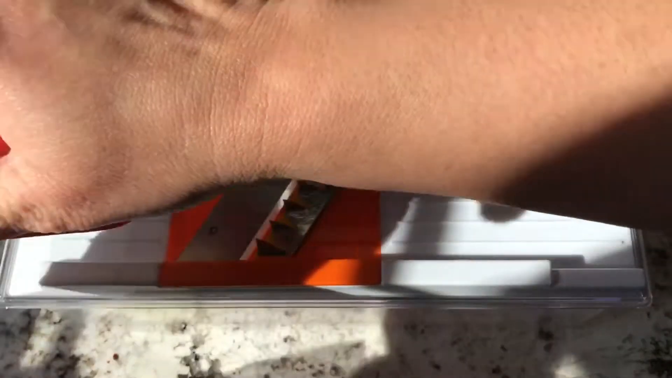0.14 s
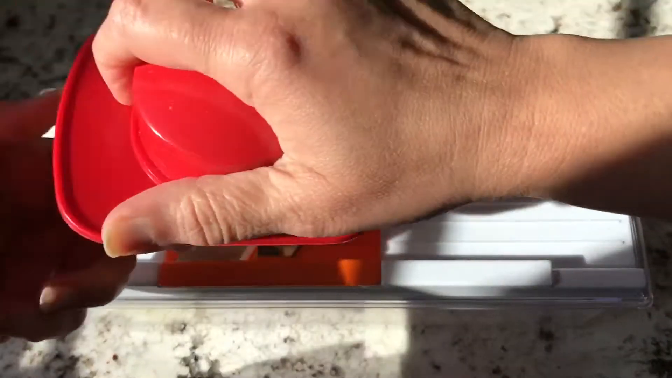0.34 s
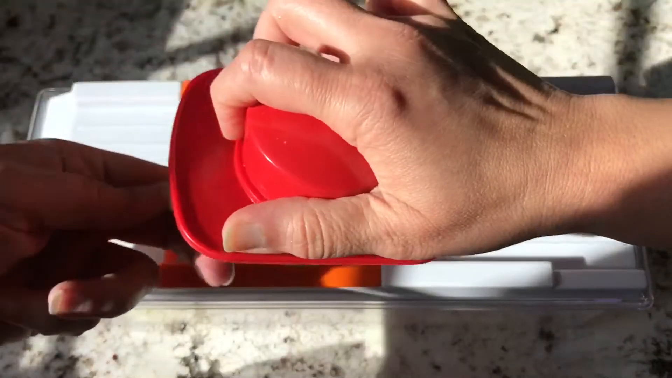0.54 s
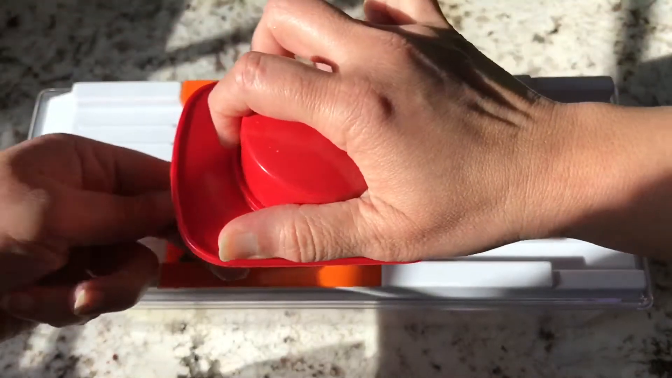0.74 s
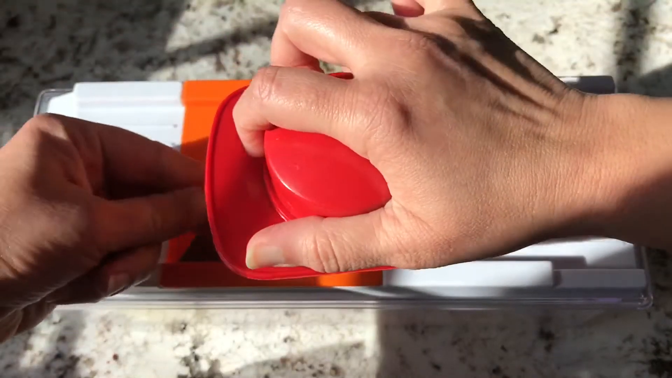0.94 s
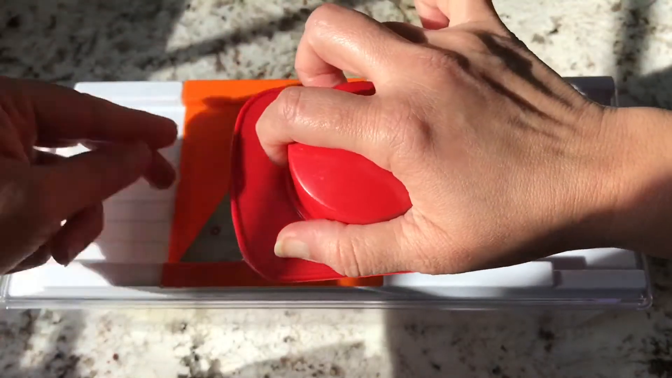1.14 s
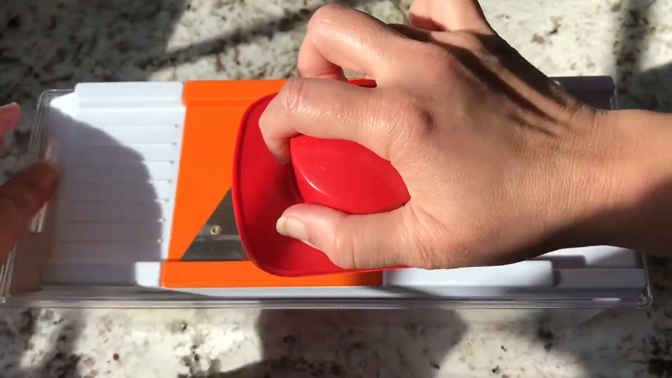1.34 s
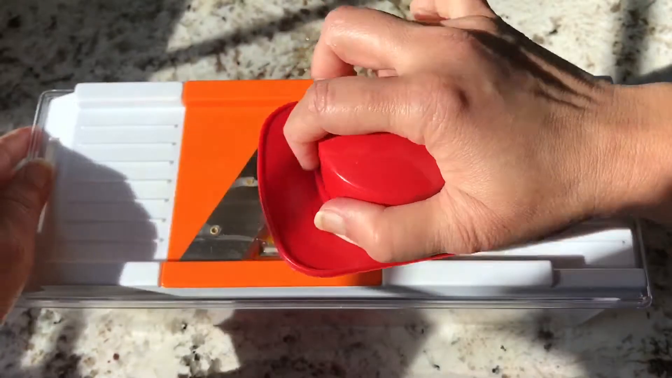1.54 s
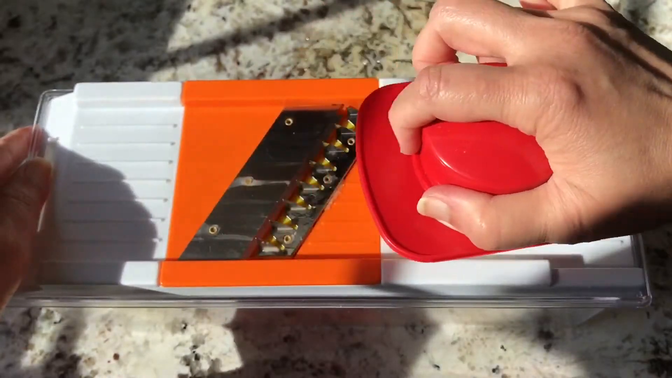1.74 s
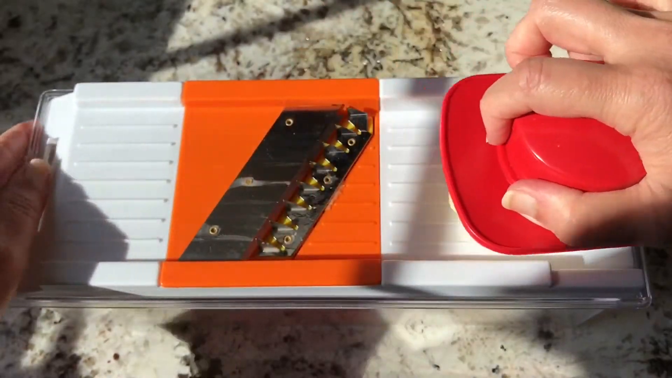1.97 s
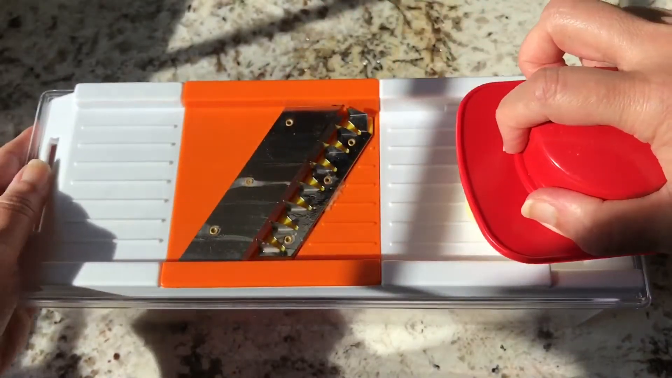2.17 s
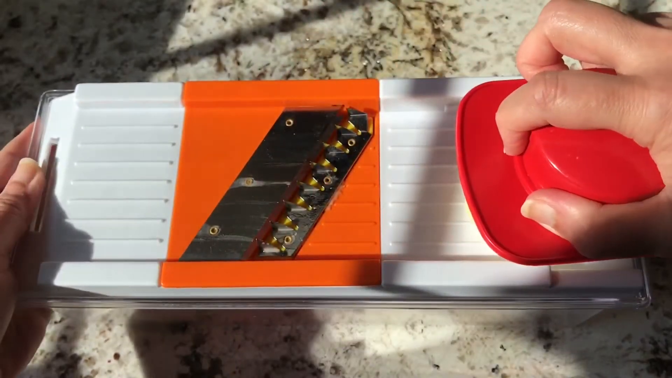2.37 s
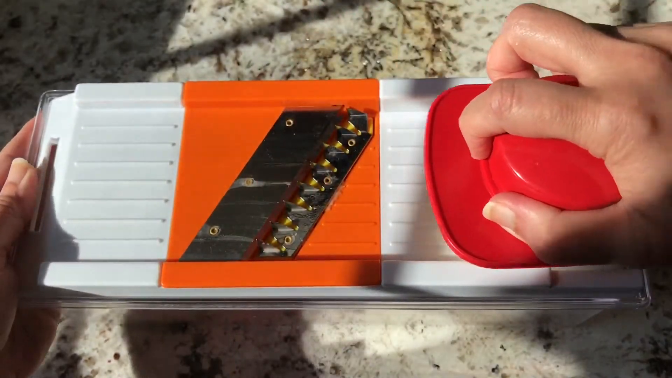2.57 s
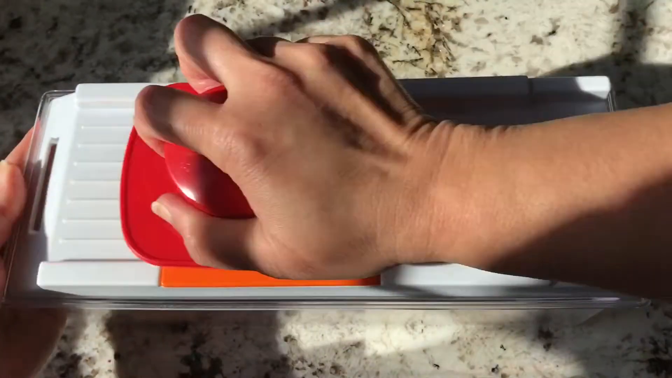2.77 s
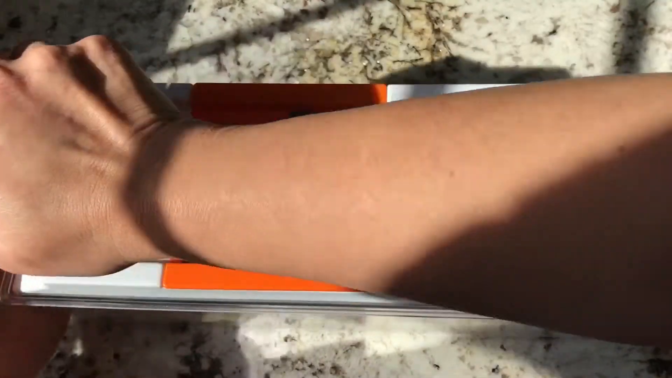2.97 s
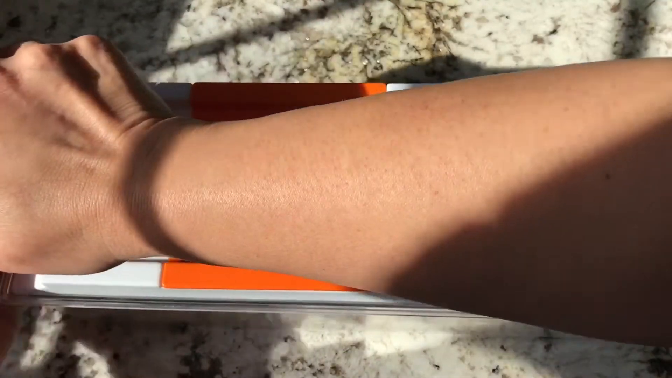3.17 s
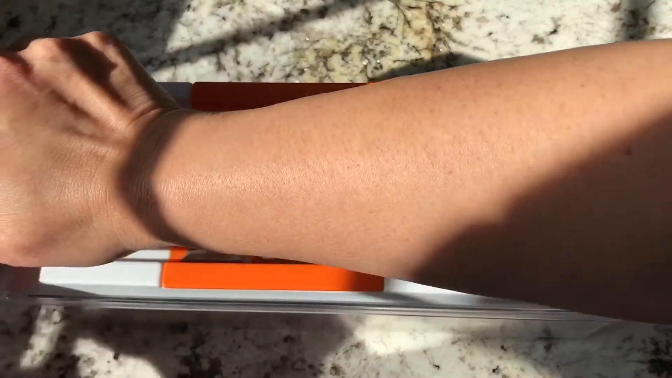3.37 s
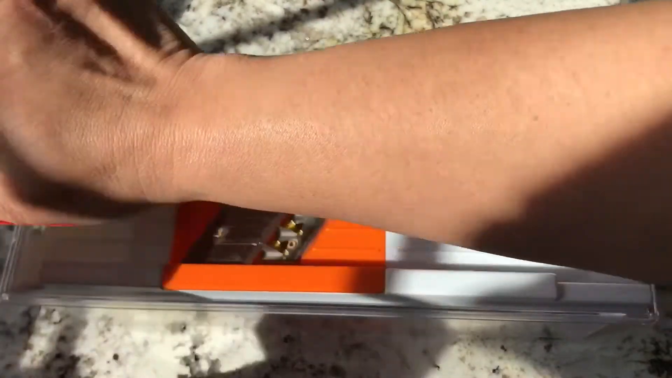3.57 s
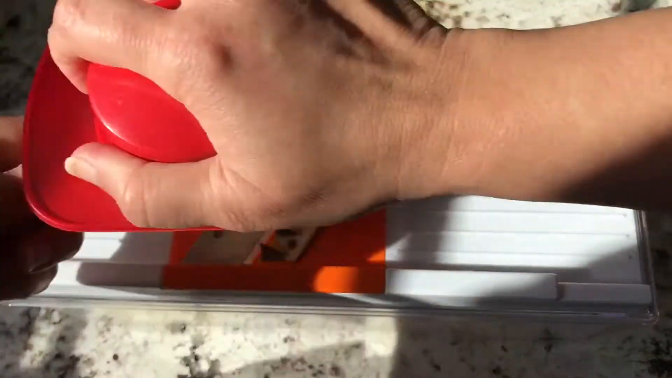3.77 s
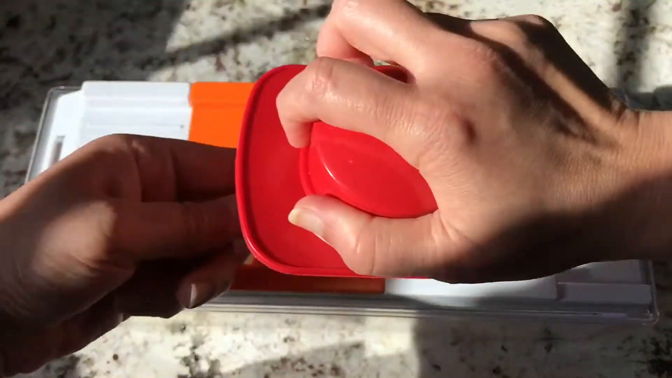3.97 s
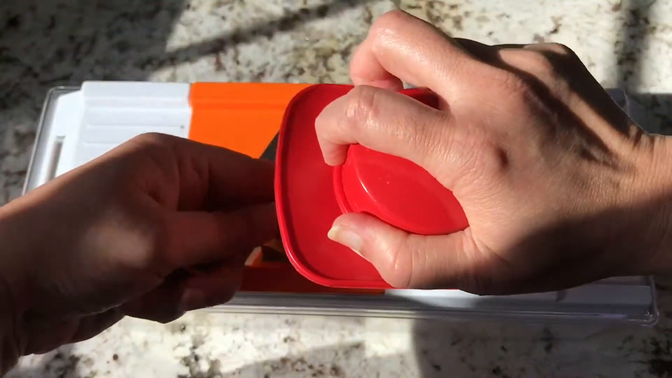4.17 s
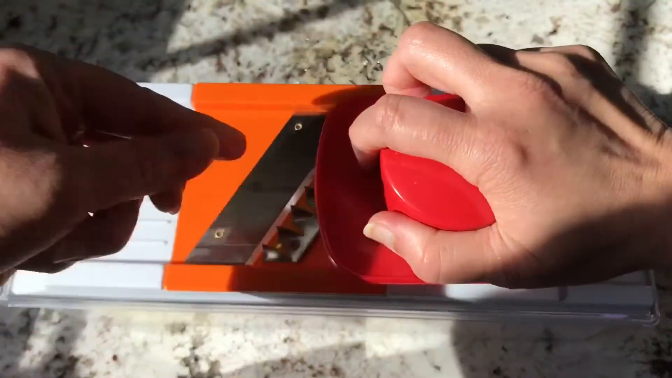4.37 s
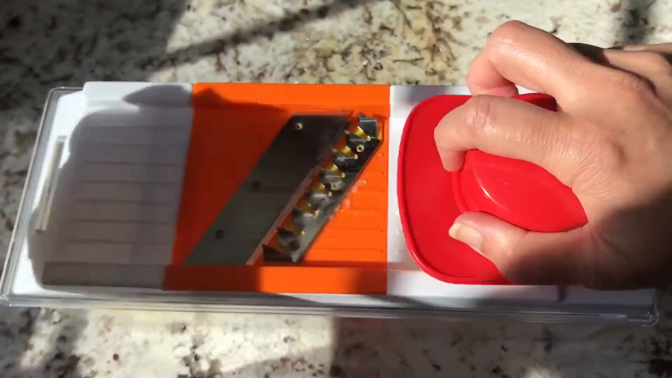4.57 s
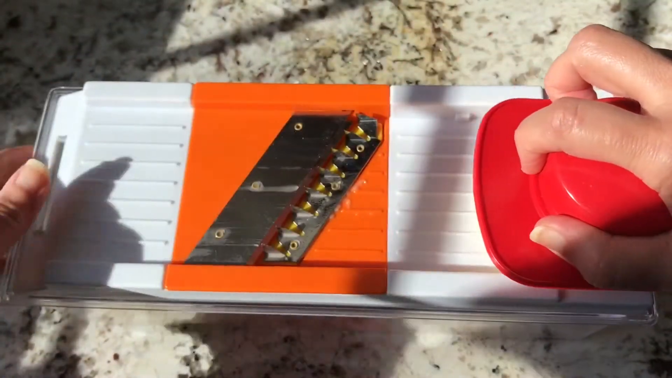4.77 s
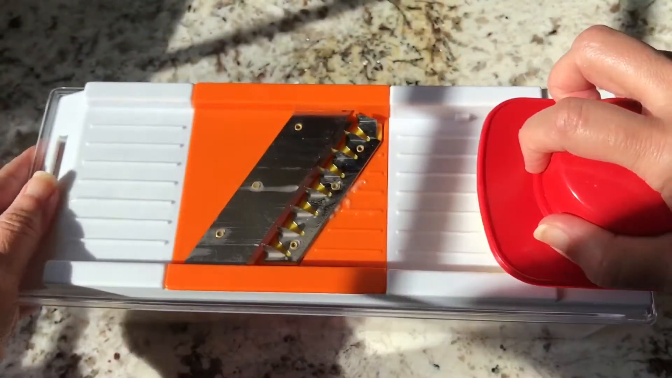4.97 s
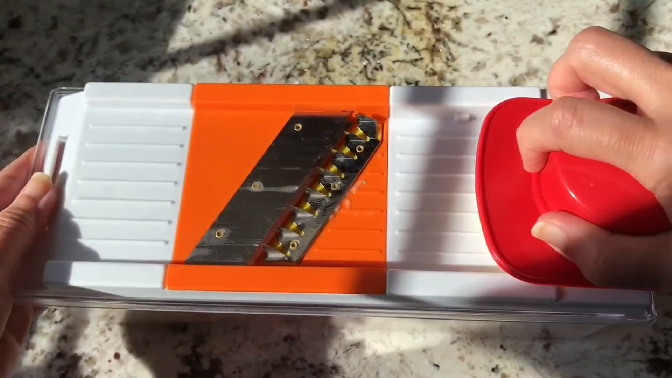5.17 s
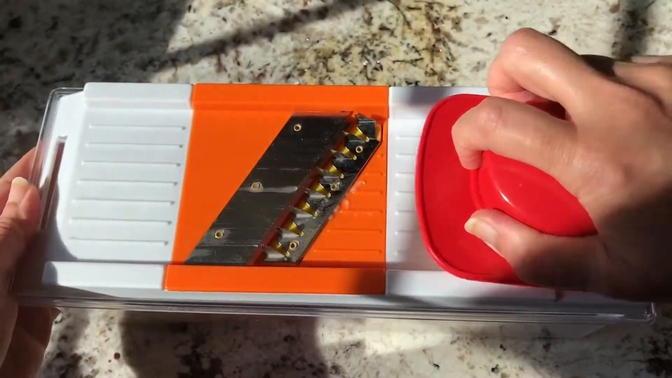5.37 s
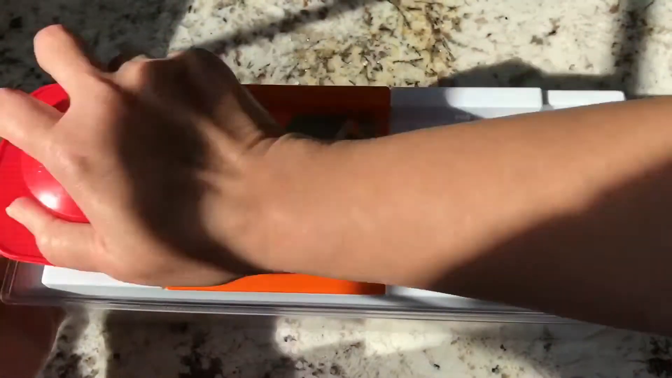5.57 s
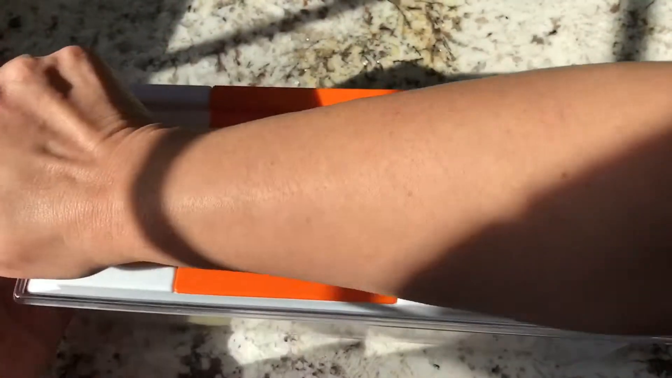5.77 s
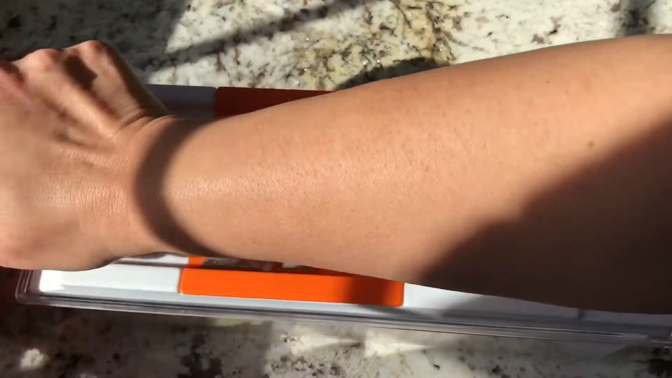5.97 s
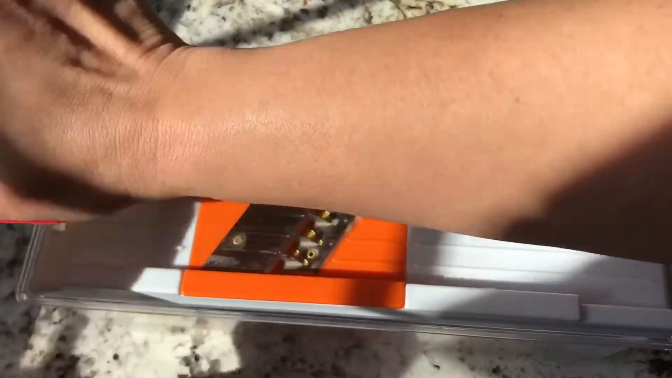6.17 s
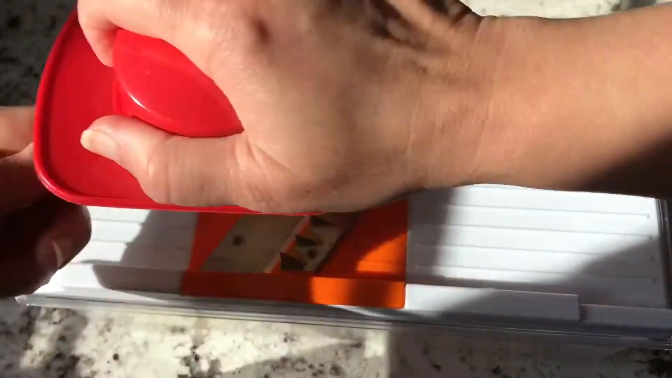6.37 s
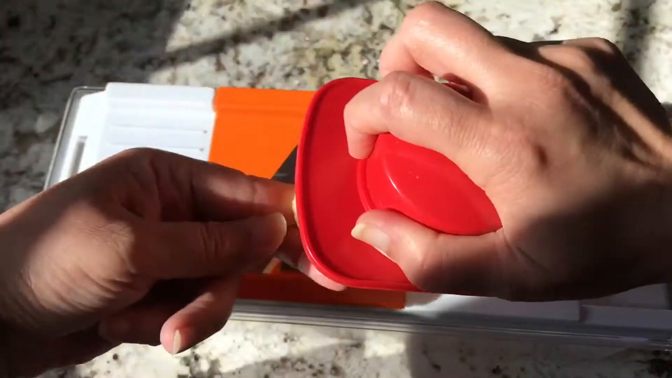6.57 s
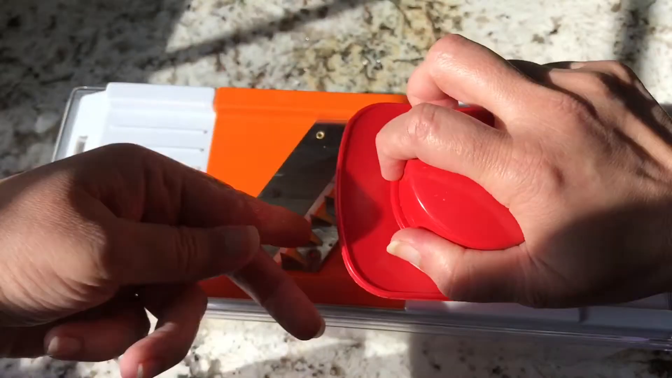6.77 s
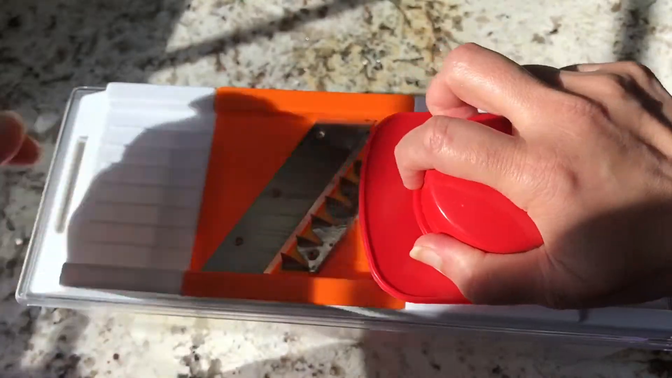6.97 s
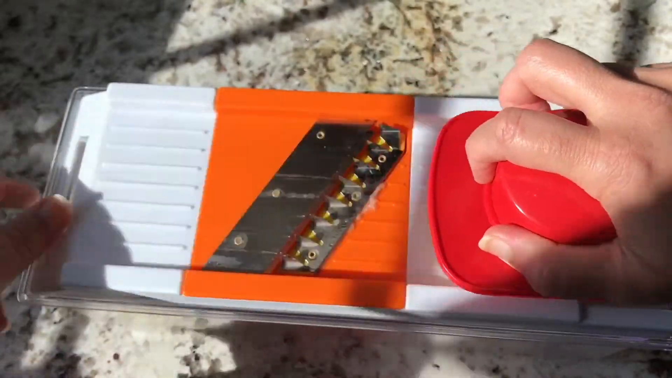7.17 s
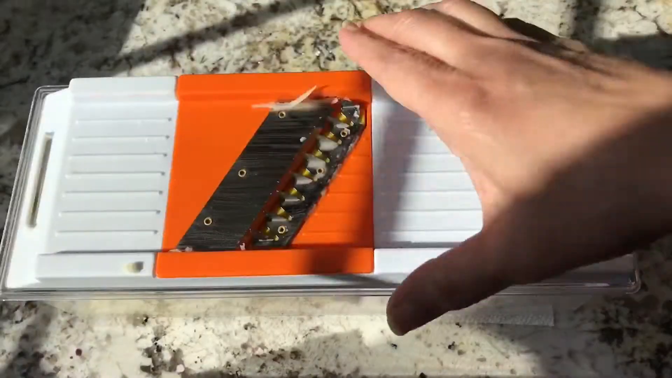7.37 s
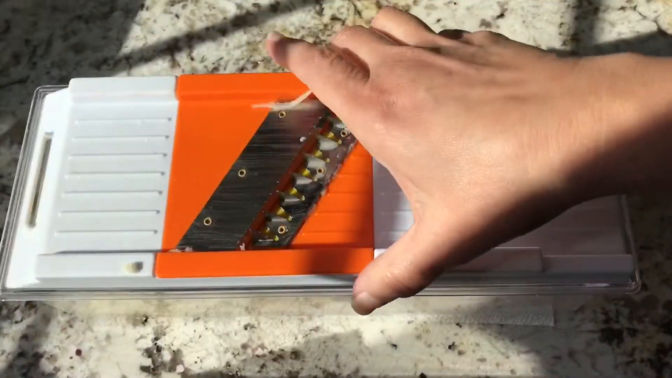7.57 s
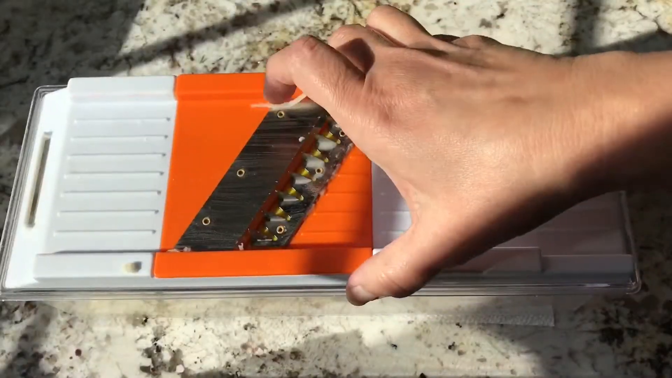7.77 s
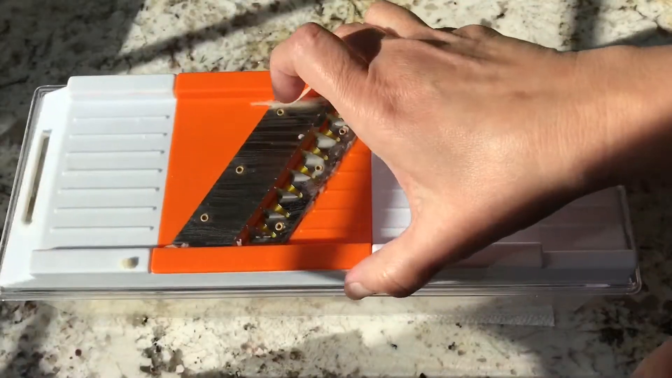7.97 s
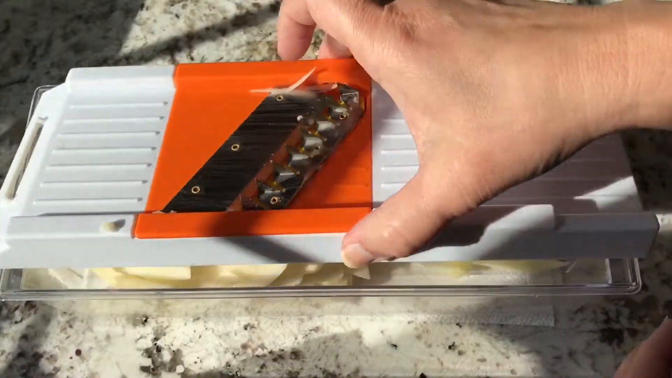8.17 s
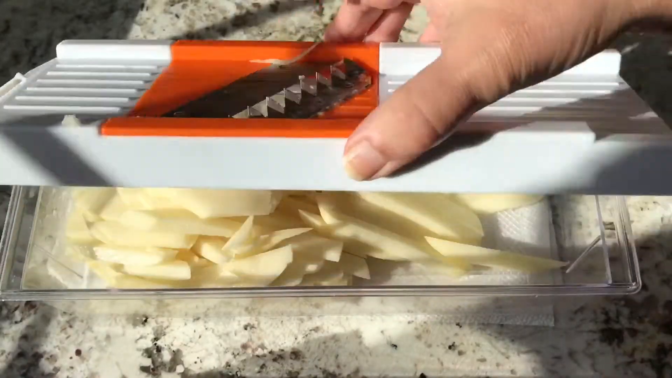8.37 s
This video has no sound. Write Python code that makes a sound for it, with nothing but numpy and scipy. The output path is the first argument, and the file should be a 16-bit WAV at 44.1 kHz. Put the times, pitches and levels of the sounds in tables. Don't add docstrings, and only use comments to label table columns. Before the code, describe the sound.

In a hard-surfaced kitchen with a low fridge hum, fingers rustle and tick on a plastic holder, then a hard double slam strikes a slicer on a hollow box. Three brief wet scrapes follow, seconds apart, the first only a graze, the others crunchier. Between them come rubs, soft thuds and plastic clacks. After a tiny hush, a quiet pause ends with the plate lifting, lightly ringing. Close microphone.

```python
import sys
import numpy as np
from scipy import signal
from scipy.fft import rfft, irfft, next_fast_len
from scipy.io import wavfile
from scipy.ndimage import uniform_filter1d

SR = 44100
rng = np.random.default_rng(int(sys.argv[2]) if len(sys.argv) > 2 else 0)


def volts(x):
    e = np.asarray(x, float) / 20
    return 10 ** e


def int16_out(signal):
    q = np.round(np.clip(np.atleast_2d(signal).T, -1, 1) * 32767)
    wavfile.write(sys.argv[1], SR, q.astype(np.int16))


N = 371746

# f/Hz, level/dB, T60/s
BOX = [(135, -15, 0.054), (247, -9, 0.038), (314, -6, 0.087), (371.4, -4.5, 0.067), (458, 2, 0.023),
       (526, -2.5, 0.038), (596, -2.5, 0.048), (700, -11, 0.21), (790, -14, 0.091)]
# f/Hz, level/dB, T60/s
PLATE = [(1004, 6.5, 0.0084), (1106, -0.5, 0.024), (1305.7, 2, 0.023), (1323, -4.5, 0.037),
         (1440, 3, 0.0045), (1790, -4.5, 0.011), (1742, -6, 0.017), (2076, -1.5, 0.013),
         (2550, -1.5, 0.013), (3040, -3.5, 0.0028), (3370, -5, 0.012), (2975, -8.5, 0.027),
         (3955, -6, 0.014)]
# f/Hz, level/dB, T60/s
FREE_PLATE = [(618, 2.5, 0.027), (708, -1.5, 0.089), (793, 1.5, 0.046), (879, 2, 0.024), (1560, -15, 0.024),
              (2010, -7, 0.033)]
# f/Hz, level/dB per Hz
HISS = [(2060, -38.5), (3500, -1), (4510, 0), (5030, -2.5), (6110, -1.5), (9510, -3), (10700, -5),
        (14700, -7), (16100, -17), (16500, -46)]
# f/Hz, level/dB, T60/s
SHELL = [(2564, -7, .004), (3550, -1.5, .008), (4360, -2, 0.0079), (6340, -5, 0.004)]
# f/Hz, level/dB, T60/s
DROPLET = [(7200, -6, .001), (9800, -1, .001), (12500, 0, .001), (14800, 0, .001)]


def unit(x):
    return x / np.sqrt(np.mean(x ** 2))


def colour(x, points):
    hz, db = np.transpose(points)
    n = next_fast_len(len(x), True)
    f = np.arange(n // 2 + 1) * SR / n + 1
    gain = volts(np.interp(np.log(f), np.log(hz), db))
    return irfft(rfft(x, n) * gain, n)[:len(x)]


def ring(modes, scatter_db, detune, size, favour_hz=400., favour_db=0., in_step=False):
    hz, db, t60 = np.transpose(modes)[:, :, None]
    pitch_draw, level_draw = rng.standard_normal((2, len(modes), 1))
    db = db + scatter_db * level_draw - favour_db * np.abs(np.log2(hz / favour_hz))
    t = np.arange(size) / SR
    wave = np.sin(2 * np.pi * hz * (1 + detune * pitch_draw) * t) * np.exp(-np.log(1000) * t / t60)
    sign = (1. if in_step else -1.) ** np.arange(len(modes))[:, None]
    return np.sum(sign * volts(db) * wave, axis=0)


def walk(rate):
    k = int(SR / rate)
    return unit(uniform_filter1d(rng.standard_normal(1000)[np.arange(N) // k], k))


def grains(rate, spread_db):
    where, size, sign = rng.random((3, N))
    return unit((where < rate / SR) * np.sign(sign - .5) * volts(-spread_db * np.log(size + 0.09)))


def gate(start, length, rise_s, fall_s):
    t = np.arange(N) / SR - start
    return t, np.clip(np.minimum(t / rise_s, (length - t) / fall_s), 0, 1)


def taps(events, modes, touch_s, click):
    out, t = np.zeros(N + 8000), np.arange(300) / SR
    for s, db in events:
        touch = rng.standard_normal(len(t)) * np.exp(-t / touch_s)
        tick = signal.fftconvolve(touch, ring(modes, 1.2, 0.0094, size=6000))
        tick = tick / np.abs(tick).max()
        tick[1:len(t)] += click * np.diff(touch)
        i = int(s * SR)
        out[i:i + len(tick)] += volts(db) * tick
    return out[:N]


def singing(spans, modes):
    gain = sum(volts(db) * gate(s, length, 0.0054, 0.013)[1] for s, length, db in spans)
    return gain * unit(signal.oaconvolve(grains(2500., 3.), ring(modes, 0, 0, size=3000))[:N])


def friction(box_gain, plate_gain, hiss_gain, slip_rate, tear_rate, patchy_db, pops, steel):
    # f/Hz, level/dB, T60/s
    blade_modes = [(3620, -6, 0.097), (4090, -0.5, 0.017), (6500, -1.5, 0.025), (6600, -3, 0.0053),
                   (7100, 0.5, 0.0087), (9360, 3.5, 0.025)]
    press = patchy_db * np.clip(walk(90), -2, 2)
    slips, tears = grains(slip_rate, 3), grains(tear_rate, 3)
    box = signal.oaconvolve(slips + 0.28 * tears, ring(BOX, 0, 0, size=4000))[:N]
    plate = signal.oaconvolve(0.41 * slips + tears, ring(PLATE, 0, 0, size=1500))[:N]
    cells = tears + pops * slips
    steel_ring = signal.oaconvolve(cells, ring(blade_modes, 0, 0, size=1000))[:N]
    hiss = unit(colour(cells, HISS)) + steel * unit(steel_ring)
    return box_gain * unit(box) + volts(press) * (plate_gain * unit(plate) + hiss_gain * unit(hiss))


def fridge():
    # f/Hz, level/dB rms
    motor_lines = [(59.2, -66), (118.4, -64.5), (242.2, -69.5), (355.3, -76), (484.5, -79.5)]
    # f/Hz, level/dB per Hz
    air_spectrum = [(15, -34.5), (25, -3.5), (70, 0.5), (150, -2), (202, -10), (389, -5), (524, -22.5),
                    (634, -7.5), (766, -19.5), (1060, -17.5), (2670, -26.5), (15200, -33.5), (16500, -41)]
    air_db = -56.5
    t = np.arange(N) / SR
    hum = 0
    for hz, db in motor_lines:
        waver_db, drift = 1.8 * walk(12.), 1.1 * walk(9.)
        hum = hum + np.sqrt(2) * volts(db + waver_db) * np.sin(2 * np.pi * hz * t + drift)
    air = unit(colour(rng.standard_normal(N), air_spectrum))
    return hum + volts(air_db - 5.0 + 0.54 * walk(0.84)) * air


def rustle():
    # t/s, length/s, level/dB
    grip_shifts = [(0.11, 0.2, -70), (0.317, 0.13, -63), (1.406, 0.071, -59.5), (2.334, 0.071, -67),
                   (3.377, 0.074, -58.5), (3.865, 0.054, -67), (6.172, 0.067, -68), (7.193, 0.047, -77),
                   (7.396, 0.15, -78), (7.667, 0.052, -70)]
    gain = sum(volts(db) * gate(s, length, .008, .03)[1] for s, length, db in grip_shifts)
    skin = signal.oaconvolve(grains(1200.0, 0.82), ring(SHELL, 0, 0, size=600))[:N]
    return gain * volts(0.83 * walk(66)) * unit(skin)


def contacts():
    # t/s, crack peak level/dB, plate rel. level/dB
    nicks = [(0.173, -30.5, -27.5), (0.362, -61, -13), (0.381, -58, 0), (0.417, -49, -3),
             (0.496, -59.5, -5.5), (0.526, -57.5, 0), (.542, -41, -6), (0.571, -43, -6), (1.41, -44, -6),
             (1.551, -44, -27), (2.59, -49.5, -21), (2.989, -27, 0), (3.077, -42, -28), (3.115, -41, -2.5),
             (3.293, -59, -6), (3.53, -52.5, 0), (3.548, -50, -26), (3.564, -42.5, -5), (3.582, -44, -10),
             (3.878, -65, -30.5), (4.275, -45, 6), (4.4, -38, -12), (5.879, -45, -3), (5.905, -43, -23),
             (5.914, -52, -1), (5.998, -53, 0), (6.177, -45, -7), (6.475, -49.5, -23.5), (6.561, -47.5, -5),
             (6.594, -59.5, 9)]
    # t/s, thump peak level/dB, plate rel. level/dB, crack rel. level/dB
    clacks = [(0.323, -55, 6, 13), (1.207, -42, -8.5, -1.5), (1.268, -27, -10, -10.5),
              (1.569, -28, 2, -0.5), (1.873, -37.5, 4.5, -1.5), (2.369, -55, 7.5, 1),
              (2.683, -26.5, -9.5, -21), (2.771, -30, 6.5, -4.5), (3.127, -27, -18, -10.5),
              (3.408, -42, 5, -10), (4.154, -37, 4.5, -6), (4.239, -25.5, -8, -16),
              (4.262, -37, 0.5, -16.5), (4.29, -46.5, 2, 3), (5.43, -40, -57, 2.5), (6.022, -36, 2, -4.5),
              (6.862, -30.5, 3.5, -9), (7.186, -38.5, -5.5, -5.5)]
    # t/s, crack peak level/dB, contact/ms
    snaps = [(0.5946, -10.5, 2.5), (0.6173, -21.5, 1.5), (0.6231, -17.5, 1.54), (1.6578, -35.5, 3),
             (1.6613, -19, 2.2), (2.7934, -24.5, 7.4), (0.59, -31, 3.5), (4.4094, -19.5, 6.1),
             (4.4115, -16, 8.3), (5.5245, -25, 5), (5.699, -32.5, 1.9), (5.706, -27.5, 2.5),
             (5.7178, -25, 3.3), (5.742, -29.5, 6), (6.8596, -42.5, 9.2), (6.866, -23.5, 2.4),
             (6.8738, -28, 4.3), (6.9003, -48, 4), (4.0101, -57, 2.5), (3.9105, -63.5, 2.6)]
    # t/s, thump peak level/dB, plate rel. level/dB,
    # strongest box mode f/Hz, contact/ms
    blows = [(.593, -7, 2.5, 450, 2.5), (.6, -5, -11, 387, 2.3), (0.619, -7.5, -6, 400, 2.7),
             (.625, -6.5, -5.5, 425, 1.7), (1.129, -20, -5.5, 400, 10.4), (1.279, -24.5, -11.5, 470, 3),
             (1.662, -3, -9, 312.5, 3.5), (2.52, -23.5, -3, 326, 1.8), (2.775, -11.5, -11, 296, 1.8),
             (2.975, -25.5, -5, 600, 6.5), (3.002, -13.5, -32, 400, 3.2), (4.148, -19.5, -17, 715, 4.6),
             (4.4128, -1, -11.5, 352, 2.8), (4.421, -7.5, -18, 351, 3.6), (4.613, -18.5, -6.5, 612, 3.7),
             (5.4882, -23.5, -5.5, 692, 2.1), (5.505, -14, -17.5, 499, 2), (5.526, -9, -11, 562, 3.8),
             (6.647, -16, -12, 387, 5.1), (6.673, -16, -5, 535, 1.3), (6.866, -11, -17, 340, 4),
             (6.873, -5, -8, 560, 0.85), (6.884, -6.5, -32, 329, 3.4), (6.902, -10.5, -10, 420, 2.5)]
    # t/s, thump peak level/dB, f/Hz
    jolts = [(1.587, -23, 384), (1.632, -24, 480), (1.654, -22, 376.5), (2.808, -11.5, 341),
             (2.821, -27, 479), (2.857, -13, 308.5), (2.917, -14, 354.4), (5.556, -10.5, 400),
             (5.601, -13, 400), (5.646, -21, 382), (5.713, -37, 494), (5.728, -29, 600), (.879, -23.5, 740),
             (.609, -13.5, 385), (0.598, -6, 387), (.631, -12.5, 400), (0.673, -24.5, 500),
             (1.6646, -9.5, 338), (2.779, -13.5, 300), (6.869, -30, 329.4), (6.893, -19.5, 326.4),
             (6.857, -34, 296), (8.184, -40, 617)]
    # t/s, thump peak level/dB, plate rel. level/dB, f/Hz
    thuds = [(0.878, -21.5, -22, 318), (1.803, -27, -15, 310), (2.635, -26.5, -23, 312.2),
             (3.245, -42.5, -12, 287), (3.46, -33.5, -13, 319), (3.507, -36, -11, 329),
             (4.35, -30, -32, 257.6), (4.49, -37.5, 2, 326), (5.006, -37.5, -11.5, 270),
             (5.187, -30.5, -17, 261), (5.274, -35.5, -37, 344), (5.373, -24.5, -17, 361),
             (6.114, -36, -15, 340), (6.138, -33, -8, 472), (7.741, -25.5, -13.5, 515),
             (7.808, -38, -15, 320), (8.168, -29, -19.5, 600), (8.298, -31, -8, 700)]
    nick_over_box_db, nick_hz, nick_ms = 19.5, 380.4, 6.8
    clack_hz, clack_ms = 430, 1.4
    snap_over_box_db, snap_plate_db = 28, -10
    thud_crack_db, thud_ms = -31.5, 3.5
    blow_crack_db, crack_per_plate = -9, 1
    touches = [(s, db - nick_over_box_db, plate + nick_over_box_db, nick_over_box_db, nick_hz, nick_ms)
               for s, db, plate in nicks]
    touches += [(*row, clack_hz, clack_ms) for row in clacks]
    touches += [(s, db - snap_over_box_db, snap_over_box_db + snap_plate_db, snap_over_box_db, nick_hz, ms)
                for s, db, ms in snaps]
    touches += [(s, db, plate, blow_crack_db + crack_per_plate * plate, hz, ms)
                for s, db, plate, hz, ms in blows]
    touches += [(s, db, -22, thud_crack_db, hz, thud_ms) for s, db, hz in jolts]
    touches += [(s, db, plate, thud_crack_db, hz, thud_ms) for s, db, plate, hz in thuds]
    return touches


def knocks():
    thump_rise_s, held_s = 0.0022, 0.02
    rattle_top_hz = 6500
    out, t = np.zeros(N + 8000), np.arange(2000) / SR
    for s, box_db, plate_db, crack_db, box_hz, ms in contacts():
        contact = max(ms, .3) / 1000
        rise = 1 - np.exp(-t / 0.00044)
        fade = (np.exp(-t / contact) + 0.34 * np.exp(-t / 0.017)) * rise
        chatter = rng.standard_normal(len(t)) * fade
        push = np.exp(-t / (0.027 * contact)) * t
        force = push / push.max() + .2 * chatter * np.exp(-t / .006)
        box = ring(BOX, 2, .02, size=4000, favour_hz=box_hz, favour_db=15, in_step=True)
        thump = signal.fftconvolve(force, box)
        age = np.arange(len(thump)) / SR
        thump = thump * (1 - np.exp(-age / thump_rise_s)) * np.exp(-age / held_s)
        plate_ring = ring(PLATE, 1, .01, size=1500, favour_hz=1850., favour_db=5)
        plate = signal.fftconvolve(chatter, plate_ring)
        bright_db = crack_db - plate_db
        slope_db = np.clip(0.2 * bright_db - 0.3 + 0.25 * min(bright_db, 0), -6, 4)
        snap = colour(rng.standard_normal(len(t)), HISS)
        snap = colour(snap, [(4000, 0.01), (16000, 2 * slope_db)])
        rattle = signal.lfilter(*signal.butter(1, rattle_top_hz, fs=SR), snap)
        crack = (snap * np.exp(-t / (0.37 * contact)) + 0.3 * rattle * np.exp(-t / 0.012)) * rise
        i = int(s * SR)
        parts = [(thump, box_db - 4.0), (plate, box_db + plate_db + 0.5), (crack, box_db + crack_db + 3.5)]
        for part, db in parts:
            out[i:i + len(part)] += volts(db) * part / np.abs(part).max()
    return out[:N]


def creaking_prongs():
    # t/s, peak level/dB
    creaks = [(0.322, -36.5), (0.5452, -35), (0.5554, -38.5), (1.171, -54), (1.2044, -47), (1.414, -49),
              (1.4252, -43.5), (1.4444, -46), (1.4785, -63), (1.4964, -68), (1.511, -50), (1.5264, -48),
              (1.552, -68.5), (1.554, -41), (3.9105, -60), (0.5495, -43.5), (3.8651, -48.5), (3.8785, -51),
              (3.904, -50.5), (3.9963, -58), (4.0114, -66), (4.0594, -58), (4.2916, -44), (6.5674, -38),
              (6.5774, -67), (6.5944, -37)]
    # f/Hz, level/dB, T60/s
    holder_modes = [(2110, -8.5, 0.014), (3550, 1.5, 0.007), (4300, -4, 0.0094), (5400, -8, 0.023),
                    (6550, -8, .01), (8500, -12.5, 0.012), (12800, -8.5, .006)]
    return taps(creaks, holder_modes, 0.0032, click=0.42)


def rubbing():
    # t/s, length/s, box level/dB, wet hiss rel. level/dB
    slides = [(0.34, 0.083, -72.5, -3.5), (0.52, 0.098, -66, -6.5), (0.78, 0.27, -54, -9),
              (0.85, 0.067, -45.5, -32), (1.105, 0.23, -45.5, -12.5), (1.385, 0.49, -65.5, 0),
              (1.768, 0.065, -48, -14), (1.902, 0.28, -65.5, 2), (4.351, 0.052, -41.5, -9),
              (2.558, 0.16, -61.5, 1), (2.65, 0.2, -59, 0.5), (2.949, 0.21, -52.5, -2.5),
              (3.17, 0.18, -63, -4), (3.354, 0.2, -56.5, -8.5), (3.874, 0.13, -70, -15),
              (4.13, 0.16, -54.5, -32), (4.242, 0.29, -45.5, -18.5), (4.526, 0.18, -56.5, -7),
              (4.684, 0.21, -64.5, -1), (4.891, 0.073, -54.5, -12.5), (5.358, 0.096, -46, -10),
              (5.432, 0.19, -40.5, -8.5), (5.785, 0.177, -63.5, 4.5), (5.971, 0.096, -50.5, -16),
              (6.024, 0.086, -60, 5), (6.123, 0.096, -62.5, -1), (6.528, 0.13, -78.5, 13.5),
              (6.7, 0.55, -58.5, -10), (7.157, 0.09, -53.5, -4.5), (7.694, 0.28, -66, 0),
              (8.23, 0.1, -58.5, -11.5)]
    rise_s, fall_s, sag_db_per_s = 0.042, 0.016, -11
    rub_plate_db, plate_per_wet = -1.5, 0.7
    gains = np.zeros((3, N))
    for s, length, db, wet_db in slides:
        t, on = gate(s, length, rise_s, fall_s)
        live = on > 0
        layers_db = np.array([[0], [rub_plate_db + plate_per_wet * wet_db], [wet_db]])
        gains[:, live] += on[live] * volts(db + layers_db + sag_db_per_s * t[live])
    return friction(*gains, slip_rate=73.0, tear_rate=3600.0, patchy_db=0.0, pops=.3, steel=0.15)


def peeling_fingers():
    # t/s, peak level/dB
    peels = [(.362, -49), (.372, -53), (.382, -48), (.398, -55), (.411, -54), (.428, -56), (.477, -61),
             (.548, -47), (.571, -44.5), (4.299, -44)]
    return taps(peels, DROPLET[2:], .0018, click=.01)


def pinched_box():
    # t/s, length/s, level/dB, f/Hz
    hums = [(.594, .011, -16, 400), (.607, .007, -21, 480), (.622, .01, -18, 560), (.634, .016, -26, 400),
            (1.137, .02, -37, 390), (1.15, .014, -40, 620), (1.272, .016, -39, 600), (1.28, .022, -37, 390),
            (1.582, .016, -33, 350), (1.627, .012, -35, 580), (1.873, .012, -44, 700),
            (2.773, .01, -27, 650), (2.852, .014, -21, 320), (2.93, .04, -34, 600), (3.25, .06, -58, 290),
            (3.405, .012, -48, 380), (3.457, .01, -49, 330), (3.507, .014, -49, 330), (4.15, .04, -50, 120),
            (5.5, .02, -37, 260), (5.525, .01, -18, 330), (5.53, .035, -25, 600), (5.6, .025, -26, 570),
            (5.638, .02, -23, 385), (5.72, .02, -33, 600), (6.674, .012, -33, 550),
            (6.871, .006, -30, 1800), (6.872, .005, -32, 2100), (6.876, .022, -23, 330),
            (7.19, .012, -53, 250), (8.272, .012, -62, 1980)]
    rise_s, fall_s = .004, .008
    out, wobble = np.zeros(N), 1 + .025 * walk(80)
    for s, length, db, hz in hums:
        live = slice(int(s * SR), int(s * SR) + 4000)
        on = gate(s, length + fall_s, rise_s, fall_s)[1][live]
        phase = 2 * np.pi * hz * np.cumsum(wobble[live]) / SR
        out[live] += np.sqrt(2) * volts(db) * on * np.sin(phase)
    return out


def ramp():
    # t/s, peak level/dB
    slams = [(.596, -18.5), (.601, -19), (.612, -23.5), (.626, -21.5), (.636, -26.5), (.648, -29.5),
             (1.6615, -24.5), (1.668, -28), (4.427, -27), (6.875, -23), (6.905, -33)]
    # f/Hz, level/dB, T60/s
    ramp_modes = [(2200, -5.5, .02), (2640, 0.5, .04), (2820, -5, 0.053), (3270, 0.5, .035),
                  (3690, -5.5, 0.02)]
    # t/s, length/s, level/dB
    squeals = [
        (4.33, .05, -71),
        (4.69, .17, -70),
    ]
    # f/Hz, level/dB, T60/s
    squeal_modes = [(4000, -4, .012), (5900, -7, .012), (6550, -2, .012), (8600, 0, .04), (9500, -8, .015),
                    (12800, -8, .008)]
    return taps(slams, ramp_modes, 0.0045, click=.01) + singing(squeals, squeal_modes)


def rail():
    # t/s, peak level/dB
    rail_hits = [(1.132, -29), (1.28, -39), (4.15, -30.5), (4.615, -29), (6.649, -24.5), (8.299, -51),
                 (.6, -18)]
    # f/Hz, level/dB, T60/s
    rail_modes = [(1320, -7, 0.043), (1849, 1, 0.066), (2089, -5.5, .035)]
    # t/s, peak level/dB
    flicks = [
        (2.974, -24),
        (2.981, -31),
        (6.676, -28),
    ]
    return taps(rail_hits, rail_modes, 0.0048, click=.01) + taps(flicks, SHELL, 0.0034, click=.01)


def wander(x):
    out = 0
    for hz in 1100 * 1.6 ** np.arange(6):
        low = signal.sosfilt(signal.butter(2, hz, fs=SR, output="sos"), x)
        out = out + low * volts(1.1 * walk(45))
        x = x - low
    return out + x


def blade():
    # t/s, cutting effort level/dB below full
    strokes = [
        [(1.568, -12.5), (1.586, -9), (1.634, -6.5), (1.644, -11.5), (1.66, -16)],
        [(2.793, -3.5), (2.823, 1), (2.917, -1.5), (2.953, -9.5), (2.997, -24), (3.02, -29)],
        [(5.526, -1.5), (5.582, 1), (5.648, -1.5), (5.682, -16.5), (5.695, -9), (5.71, -5), (5.736, -13.5),
         (5.764, -4), (5.81, -25)],
    ]
    # level/dB at full effort, slope/dB per dB of effort
    cut_layers = [(-26, 1.3), (-29, 1.34), (-25.5, 1.37)]
    stroke_plate_db = [-6.5, 1, 1]
    stroke_wet_db = [-7.5, -0.5, 0]
    # f/Hz, level/dB
    cut_body = [(200, -2), (330, 0.9), (650, -0.5), (950, -7.5), (1400, 2.5), (2600, 2), (5200, -1.5),
                (9000, -1)]
    bite_s = 0.0028
    gains = 0
    for (s, effort), plate_db, wet_db in zip(map(np.transpose, strokes), stroke_plate_db, stroke_wet_db):
        t, on = gate(s[0], s[-1] - s[0], bite_s, bite_s)
        effort_db = np.interp(t, s - s[0], effort)
        layers = volts([db + slope * effort_db for db, slope in cut_layers])
        gains = gains + on * layers * volts([[0], [plate_db], [wet_db]])
    cut = friction(*gains, slip_rate=500., tear_rate=11000., patchy_db=0.1, pops=0.31, steel=0.27)
    return wander(colour(cut, cut_body))


def grazed_plate():
    # t/s, length/s, level/dB
    grazes = [
        (1.572, 0.0071, -38.5),
    ]
    # f/Hz, level/dB, T60/s
    graze_modes = [(1400, 2, 0.039), (1815, 1, 0.044), (4500, -9, .02), (8350, 1, .008)]
    return singing(grazes, graze_modes)


def droplets():
    # t/s, peak level/dB
    pricks = [(3.0924, -46), (3.275, -49), (5.88, -50), (3.482, -60), (3.9963, -52), (4.0094, -55),
              (4.2938, -38), (4.305, -41), (4.7541, -49), (6.4122, -54), (6.4745, -59), (6.5237, -52),
              (6.538, -43), (6.6154, -58.5), (6.7115, -49), (6.7945, -59), (6.8219, -51), (5.916, -44),
              (7.1317, -43), (7.2534, -41)]
    return taps(pricks, DROPLET, .0018, click=.03) * volts(-2.5)


def singing_steel():
    # t/s, length/s, level/dB
    drags = [
        (5.738, 0.0472, -34),
        (5.757, 0.0282, -36.5),
    ]
    # f/Hz, level/dB, T60/s
    steel_modes = [(1300, -4.5, 0.039), (2150, -8, 0.071), (2895, -5.5, 0.066), (3550, -19, .05),
                   (3880, -7, .05), (9020, -5, 0.037), (9700, -1.5, 0.033)]
    return singing(drags, steel_modes)


def lifted_plate():
    # t/s, peak level/dB
    lifts = [
        (8.167, -41.5),
        (8.298, -28.5),
    ]
    return taps(lifts, FREE_PLATE, 0.0046, click=0.075)


def carried_plate():
    # t/s, length/s, level/dB
    carries = [
        (8.2, .09, -61),
        (8.31, .13, -56),
    ]
    return singing(carries, FREE_PLATE[:4])


def kitchen(x):
    # f/Hz, T60/s
    room_decay = [(150, 0.69), (400, 0.33), (1500, 0.38), (5000, 0.92), (12000, 0.25)]
    room_db, tilt_db_per_oct, build_s = -17, -0.3, 0.0017
    room_hz, room_t60 = np.transpose(room_decay)
    out = 0
    for hz in 140 * np.sqrt(2) ** np.arange(14):
        band = signal.butter(2, [hz / 2 ** .25, hz * 2 ** .25], "band", fs=SR, output="sos")
        t60 = np.interp(np.log(hz), np.log(room_hz), room_t60)
        energy = signal.sosfilt(band, x) ** 2
        for tau_s in build_s, t60 / np.log(1e6):
            kept = np.exp(-1 / (tau_s * SR))
            energy = signal.lfilter([1 - kept], [1, -kept], energy)
        gain = volts(room_db + tilt_db_per_oct * np.log2(hz / 1000))
        out = out + gain * np.sqrt(energy) * unit(signal.sosfilt(band, rng.standard_normal(N)))
    return out


def counter(near):
    force = np.sqrt(uniform_filter1d(near ** 2, size=3000) + 1e-12)
    shudder = signal.lfilter(*signal.iirpeak(62, 1.2, fs=SR), rng.standard_normal(N))
    return volts(-31) * force * unit(shudder - uniform_filter1d(shudder, size=1000))


def near_walls(x):
    near_db, t60_s, bottom_hz, top_hz = -20.5, 0.51, 450, 3600
    t = np.arange(20000) / SR
    tail = signal.lfilter(*signal.butter(2, top_hz, fs=SR), rng.standard_normal(len(t)))
    tail = tail * np.exp(-np.log(1000) * t / t60_s)
    tail = signal.lfilter(*signal.butter(1, bottom_hz, "high", fs=SR), tail)
    return volts(near_db) * signal.oaconvolve(x, tail / np.sqrt(np.sum(tail ** 2)))[:N]


def scene():
    # f/Hz, level/dB
    radiates = [(110, 3), (170, -3.5), (240, 0), (300, -1)]
    near = rustle() + knocks() + creaking_prongs() + rubbing() + pinched_box() + ramp()
    near = near + blade() + grazed_plate() + droplets() + singing_steel() + lifted_plate()
    bass_cut = signal.butter(3, 125., "high", fs=SR, output="sos")
    near = signal.sosfilt(bass_cut, colour(near, radiates))
    side = rail()
    heard = near + side + kitchen(near + side) + fridge() + counter(near) + near_walls(near)
    return (heard + peeling_fingers() + carried_plate())[None]


def top_cut(x):
    return signal.sosfilt(signal.butter(12, 16820, fs=SR, output="sos"), x)


def record(dry):
    # f/Hz, level/dB
    treble_response = [(9300, 0), (10500, -2.5), (11800, 0.5), (15700, 1.5), (16600, -20.5), (16900, -55.5)]
    change_s, fade_s = 7.273, .027
    fade = np.clip(np.abs(np.arange(N) / SR - change_s) / fade_s, .05, 1)
    return top_cut(colour(dry[0], treble_response)[None] * fade)


dry = scene()
out = record(dry)
int16_out(out)
```